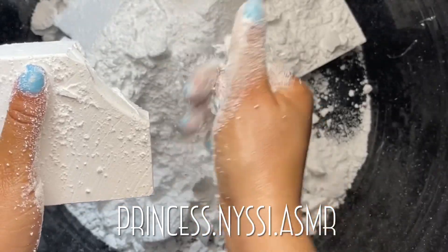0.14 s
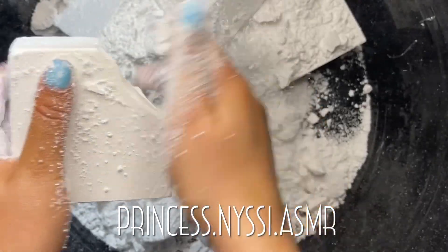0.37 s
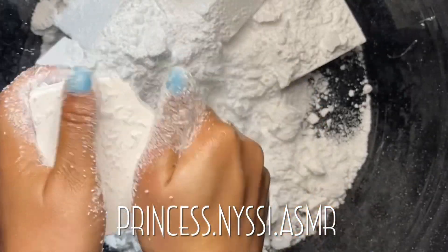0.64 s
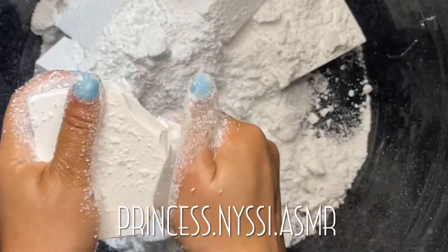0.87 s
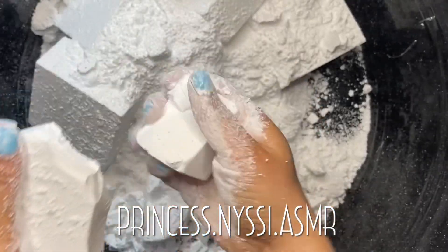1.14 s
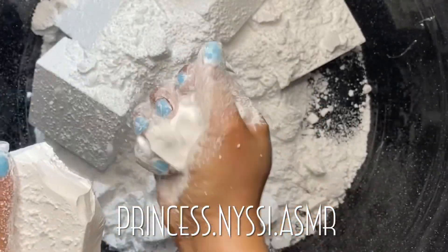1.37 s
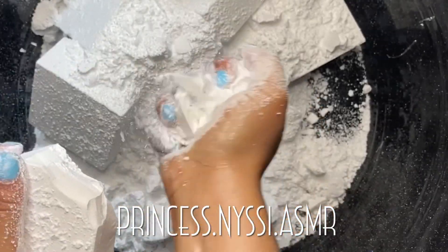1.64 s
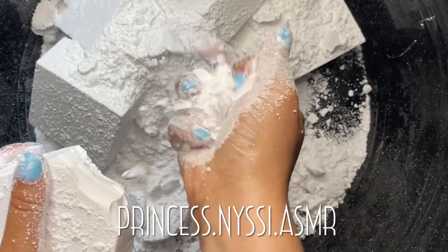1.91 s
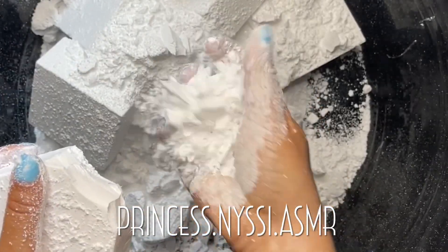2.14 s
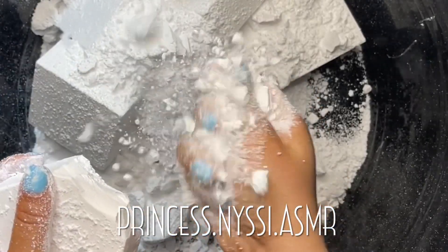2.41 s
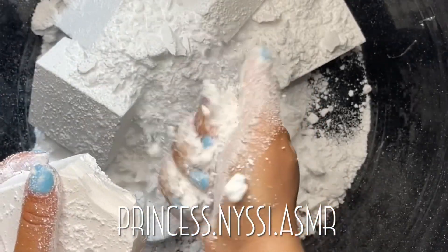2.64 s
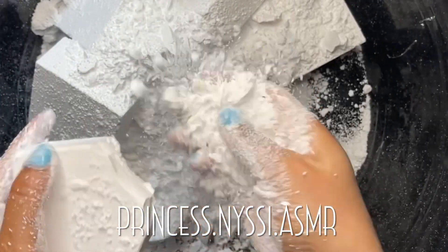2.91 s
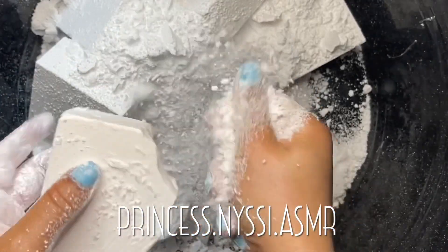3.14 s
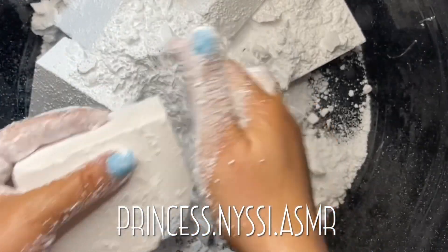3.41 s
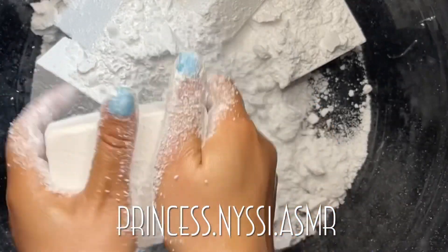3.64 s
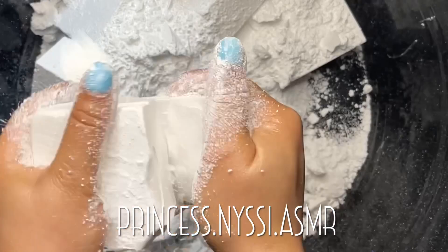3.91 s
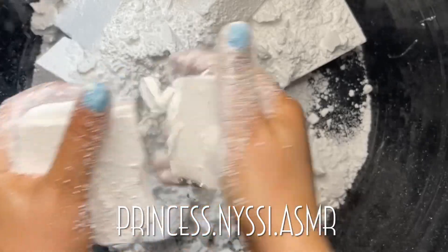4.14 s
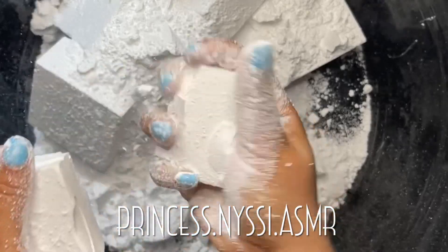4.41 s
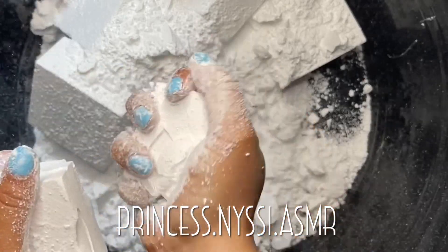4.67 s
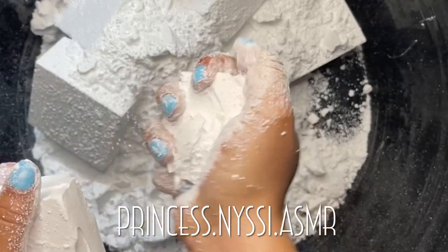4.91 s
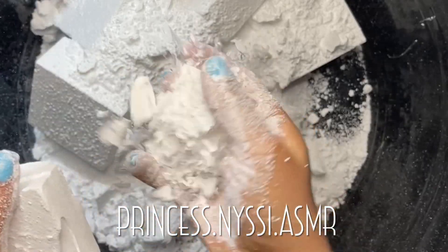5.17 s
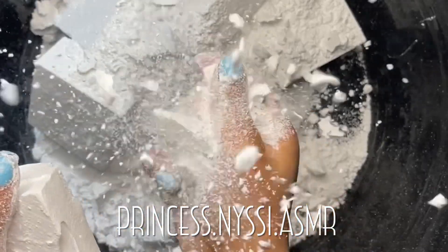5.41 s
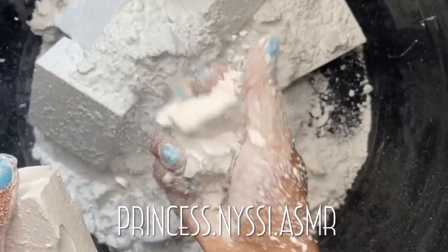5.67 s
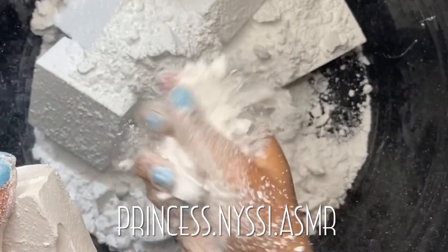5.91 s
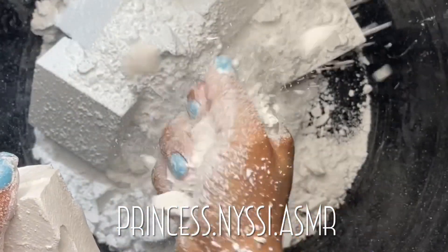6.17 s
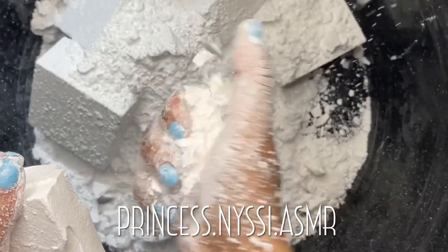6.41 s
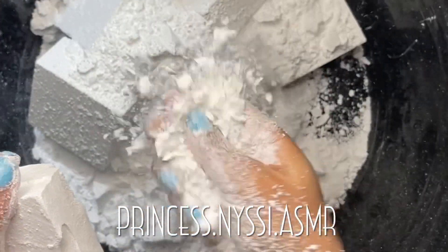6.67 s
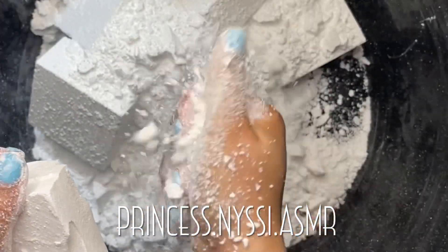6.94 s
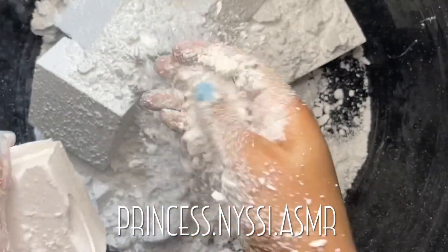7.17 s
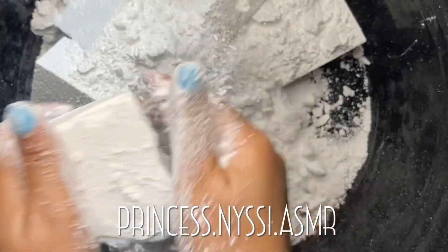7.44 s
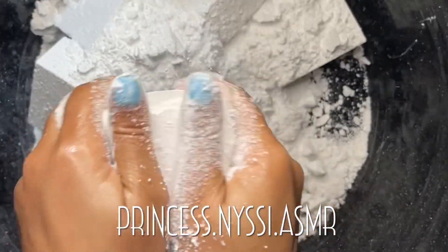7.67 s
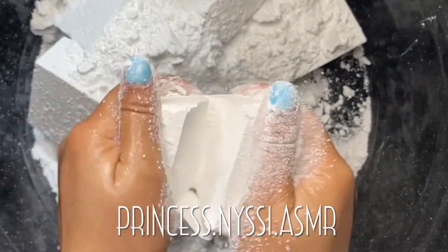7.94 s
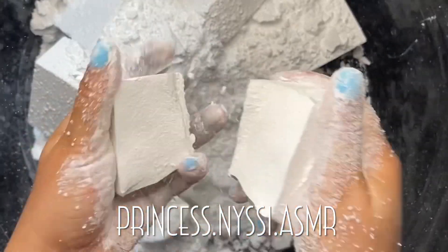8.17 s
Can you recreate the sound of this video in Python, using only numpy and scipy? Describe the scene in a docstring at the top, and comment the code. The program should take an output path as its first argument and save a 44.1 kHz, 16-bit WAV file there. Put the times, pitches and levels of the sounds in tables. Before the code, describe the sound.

Hands break and crush soft chalk close to a pair of microphones. Small lumps drop first, then a block snaps and crisp cracks sputter on. Powdery rubbing and falling crumbs lead to a louder snap with a short squeak, then dense crunching with low tub thuds. It thins before a final hollow snap. Quiet room, faint rumble, hiss and hum; the loudest blows distort.

```python
"""Hands snap and crush soft chalk blocks over a wide plastic tub, close to a pair of microphones.
Small lumps and cracks come first, then a block snaps at 0.7 s and more cracks follow until 1.8 s.
Rubbing and falling crumbs lead to a snap at 3.8 s with a squeak; crushing is densest from 5.1 to 6.4 s.
It thins out, with a squeak at 7.0 s and a last snap at 7.7 s. Cracks and grit are filtered bursts and ticks,
lumps ring the tub's modes, and faint rumble, hiss and hum last throughout. The loudest blows overload."""
import sys
import numpy as np
from scipy import signal
from scipy.fft import rfft, irfft
from scipy.io import wavfile
from scipy.ndimage import uniform_filter1d

SR = 44100
rng = np.random.default_rng(int(sys.argv[2]) if len(sys.argv) > 2 else 0)


def ratio(d):
    """dB to gain"""
    e = np.asarray(d, float) / 20
    return 10 ** e


def pcm_store(signal):
    """Save signal as 16-bit PCM."""
    levels = np.round(np.clip(np.atleast_2d(signal), -1, 1) * 32767)
    wavfile.write(sys.argv[1], SR, levels.astype(np.int16).T)


N = 366466  # length in samples

# Low part of the sound of breaking chalk. Each row: frequency in Hz, relative level in dB.
DULL_COLOUR = [(20, -56), (80, 13.5), (250, 11), (400, 13.5), (650, 6.5), (1500, -9.5), (3000, -49.5)]
# Middle part of the sound of breaking chalk. Each row: frequency in Hz, relative level in dB.
BODY_COLOUR = [(300, 4.5), (900, 8), (1800, 9.5), (2700, 8.5), (3800, 9), (4800, -4), (9000, -62)]


def read(points, hz):
    """Looks a value up between table points on a log-frequency axis."""
    f, value = np.transpose(points)
    return np.interp(np.log(hz + 1), np.log(f + 1), value)


def evened(x):
    """Scales a sound to rms 1."""
    return x / np.sqrt(np.mean(x ** 2) + 1e-20)


def colour(x, points):
    """Gives a sound the spectrum of a table, with a filter that never acts ahead of time and has energy 1."""
    log_gain = np.log(ratio(read(points, abs(np.fft.fftfreq(4096, 1 / SR)))))
    minimum_phase = np.exp(np.conj(signal.hilbert(log_gain)))
    taps = np.fft.ifft(minimum_phase).real[:2048]
    return signal.oaconvolve(x, taps[None] / np.linalg.norm(taps), axes=1)[:, :N]


def ring(x, hz, q):
    """Two-pole resonance: a unit tick rings with height about 1, longer for a higher q."""
    r, turn = np.exp(-np.pi * hz / q / SR), 2 * np.pi * hz / SR
    top = [np.sin(turn), 0, -np.sin(turn) * r]
    bottom = [1, -2 * r * np.cos(turn), r * r]
    return signal.lfilter(top, bottom, x) / (2 * np.sin(turn))


def ports(pair):
    """Mixes two unrelated versions into the two microphones: alike in part, the right a little late."""
    # How alike left and right are. Each row: frequency in Hz, correlation from 0 to 1.
    likeness = [(300, 0.92), (900, 0.76), (2000, 0.9), (4000, 0.82), (12000, 0.48)]
    # Balance of the microphones. Each row: frequency in Hz, left over right in dB.
    balance = [(200, 0), (700, -0.5), (2400, -2.5), (8000, 0), (15000, 1)]
    right_delay_s = 4.5e-5  # the left microphone is nearer
    hz = np.fft.rfftfreq(N, 1 / SR)
    a, b = rfft(pair)
    turn = np.arccos(np.clip(read(likeness, hz), 0, 1)) / 2
    lean = ratio(read(balance, hz) / 2)
    left = np.cos(turn) * a + np.sin(turn) * b
    right = np.cos(turn) * a - np.sin(turn) * b
    late = np.exp(-2j * np.pi * hz * right_delay_s)
    return irfft(np.array([left * lean, right / lean * late]), N)


def hand():
    """The hand tightens, holds and lets go; the powers of all squeezes add up to control curves in dB."""
    # Each squeeze or rub. Each row: start in seconds, hold in seconds, grit in dB,
    # fine powder against the grit in dB, crumbs raining into the tub in dB.
    squeezes = [(-.03, 0.095, -52, 2.5, -31.5), (0.235, 0.058, -46.5, 9, -29.5),
                (0.324, 0.05, -47, 10, -33), (0.476, 0.059, -44.5, 10, -37), (0.632, 0.036, -39, 2, -39),
                (1.053, 0.14, -45, 2, -33), (1.318, 0.065, -35.5, 0.5, -41), (1.46, 0.29, -48.5, 5.5, -36),
                (1.785, 0.2, -44, -5, -32.5), (2.115, 0.3, -37.5, -1.5, -26.5),
                (2.392, 0.19, -37.5, -3, -22), (2.637, 0.22, -52.5, 6.5, -29),
                (2.865, 0.042, -40, -1, -23.5), (2.92, 0.027, -40, 2.5, -28), (3.017, 0.13, -43, 2, -16),
                (3.206, 0.079, -49.5, 6.5, -27.5), (3.419, 0.15, -42.5, 5, -27.5),
                (3.53, 0.15, -46.5, -4, -28.5), (3.723, 0.055, -41, -12, -44),
                (3.793, 0.047, -28, -10, -26), (3.85, 0.03, -34, -4.5, -33), (3.947, 0.21, -55.5, 8, -30.5),
                (4.195, 0.33, -53, 3, -37), (4.357, 0.092, -63, -15, -26.5), (4.54, 0.11, -48, 0.5, -50),
                (4.69, 0.18, -60.5, 4.5, -60), (4.902, 0.12, -41, -3, -77), (5.108, .18, -42, 3.5, -45),
                (5.355, 0.097, -32.5, -3.5, -24.5), (5.454, 0.23, -35.5, -4, -22.5),
                (5.797, 0.13, -37.5, -4.5, -28), (5.99, 0.098, -32, -4.5, -26),
                (6.13, 0.14, -41.5, -5, -26.5), (6.294, 0.028, -27, -21, -31),
                (6.358, 0.023, -33.5, -3, -15), (6.47, 0.17, -34, -9, -22.5), (6.603, .2, -39.5, 2, -25),
                (6.824, 0.14, -45, 3, -28), (7.03, 0.14, -45, -6, -26.5), (7.12, 0.14, -41, -3, -26),
                (7.36, 0.24, -48, 4, -24), (7.506, 0.083, -52.5, 5, -22.5),
                (7.633, 0.032, -39, -5.5, -30.5), (7.692, 0.024, -39, 0, -25),
                (7.755, 0.14, -45.5, -23.5, -44), (7.972, 0.048, -62.5, 17.5, -40.5),
                (8.17, 0.089, -52.5, 11, -37)]
    grip_s, swell_share = 0.01, 0.27  # the rise takes grip_s plus this share of the hold
    let_go_db_per_s = 132
    still_db, still_crumbs_db = -57.5, -49.5  # what stirs in between
    start, hold, grit_db, fine_db, crumbs_db = np.transpose(squeezes)[:, :, None]
    t = np.arange(0, N / SR + .01, .004)
    tighten = np.clip((t - start) / (grip_s + swell_share * hold), 0, 1)
    let_go = ratio(-let_go_db_per_s * np.maximum(t - start - grip_s - hold, 0))
    grip = tighten * let_go

    def total_db(db, floor_db):
        """Adds the powers of all squeezes and of the still level."""
        return 10 * np.log10(((grip * ratio(db)) ** 2).sum(0) + ratio(floor_db) ** 2)

    grit_sum = total_db(grit_db, still_db)
    fine_sum = total_db(grit_db + fine_db, still_db)
    crumbs_sum = total_db(crumbs_db, still_crumbs_db)
    coarse = 0.5 + 0.68 * (crumbs_sum - grit_sum - 20)  # more falling crumbs, more coarse crumble
    controls = {"grit": grit_sum, "fine": fine_sum - grit_sum, "crumbs": crumbs_sum, "coarse": coarse}
    return {name: np.interp(np.arange(N) / SR, t, curve) for name, curve in controls.items()}


def cracks():
    """A fracture starts with one sharp tick and runs on as an uneven sputter; the freed piece rings briefly."""
    # Each crack. Each row: start in seconds, relative strength in dB, ring of the piece in Hz,
    # relative brightness in dB, left over right in dB.
    crack_rows = [(0.267, -25, 567, -22, -2.0), (0.287, -20.5, 2080, -18, -1), (0.381, -25.5, 1500, -5, -4),
                  (0.624, -19, 537, -4, -3), (0.646, -1, 4100, -15.5, -1), (0.666, -6, 4000, -11, -2),
                  (0.671, -7, 2060, -4.5, 7), (0.686, -3, 2780, -26, -7), (0.734, -11, 2470, -9, 0),
                  (0.874, -33.5, 900, -5, -4), (1.082, -24, 2500, -5.5, -1.5), (1.116, -29.5, 655, -1, 2),
                  (1.151, -32.5, 1120, -9, 7), (1.186, -11, 3280, -31, -6), (1.223, -27, 3180, -18, -0.5),
                  (1.299, 11, 2810, -19, 1), (1.34, -7.5, 1660, -13, -1), (1.37, 0, 3340, -35, -3.5),
                  (1.383, -12, 3510, -4, 7), (1.394, -7, 2400, -23, -6), (1.402, -5.5, 2930, -21, -2.5),
                  (1.429, -9.5, 2860, -19, 8), (1.45, -10.5, 2720, -45, -2), (1.487, -26.5, 940, 11, 4),
                  (1.5, -1, 2540, -22.5, -1.5), (1.511, -18, 3700, -9, -10),
                  (1.542, -15.5, 1960, -4.5, 0.5), (1.569, -26, 3340, -15, -5), (1.604, -18, 1440, -14, 4),
                  (1.614, -7.5, 2940, -21, -2.5), (1.666, -14.5, 1790, -12, 1),
                  (1.678, -5, 3170, -36, -3.0), (1.693, -15.5, 2360, -13, 4), (1.775, -21, 2060, -25, 1),
                  (1.845, -19, 2880, -26, -1.5), (1.862, -24.5, 613, -3, -1.5), (1.956, -19, 840, -22, -4),
                  (1.968, -16.5, 2360, -32, 0), (2.059, -28, 1660, -23, -3), (2.159, -29.5, 2030, 4.5, -2),
                  (2.219, -21, 2620, -39, -4), (2.274, -16, 1900, -17, -5), (2.306, -16.5, 1830, -14, 2),
                  (2.385, -19, 2150, -24, -4), (2.447, -25, 1010, -10, 0), (2.476, -12, 920, -9, -7.5),
                  (2.604, -18, 674, -30, -4), (2.655, -20, 655, -41, -10), (2.779, -32.5, 686, 1, 2),
                  (2.866, -24, 640, -8, 0), (2.884, -23, 619, -20, 0), (2.912, -33, 560, -16, -1.5),
                  (2.935, -20.5, 1540, -17, 2), (2.953, -19, 3260, -13, -8), (2.977, -36, 622, 9, 8),
                  (3.054, -19, 1930, -27, -4), (3.072, -22.5, 604, -3.5, -3.0),
                  (3.134, -35, 783, -10, -1.0), (3.166, -16, 756, -29, -1), (3.248, -21.5, 993, -23, 2),
                  (3.4, -24, 3980, -20, -2), (3.465, -30, 1180, -9, 7), (3.548, -12, 2320, -23, 0),
                  (3.584, -25, 1530, -22, -13), (3.602, -16, 860, -7, -4), (3.621, -13.5, 660, -61, -10),
                  (3.803, 8, 2080, -10.5, -1.0), (3.827, -16, 645, -30, -2.0),
                  (3.979, -17, 1060, -8.5, 1.0), (4.009, -22.5, 589, -12, 8), (4.062, -21, 651, -39, 3),
                  (4.098, -22.5, 750, -27, -3), (4.217, -28, 1070, -8, -1.5), (4.238, -29, 610, -9, -3.5),
                  (4.329, -34, 552, -21, 3), (4.343, -32, 875, -9, 2), (4.368, -15.5, 1210, -3.5, -1),
                  (4.53, -6, 2970, -26, -1), (4.55, -1, 2000, -8.5, 0.5), (4.583, -2, 3500, -23.5, 0),
                  (4.611, -6.5, 2840, -48, -1), (4.644, -13, 2760, -32, 0), (4.703, -13, 2930, -19.5, 0),
                  (4.799, -15.5, 2580, -43, -2), (4.934, -13, 2270, -8, 0.5), (4.954, -18.5, 2100, -23, 0),
                  (4.983, -26, 2570, -29, -1.5), (5.007, -22, 2090, -22, -2.0), (5.018, -27, 600, -1, -0.5),
                  (5.038, -10.5, 3300, -24, -2), (5.11, -1, 2680, -33, 0), (5.13, -16, 891, 4, 0),
                  (5.141, -16, 1870, -3.5, -4), (5.165, -8.5, 1410, -4, 8), (5.171, -5, 1530, -5, -2),
                  (5.192, -0.5, 2120, -5.5, -3), (5.2, 1, 1960, -52, 4), (5.216, -6, 990, -9.5, 0),
                  (5.223, -13, 1010, -3, -5), (5.244, -4.5, 2340, -8, 0), (5.28, -3.5, 2460, -12, -1),
                  (5.34, -13.5, 600, -38, -4), (5.356, -18, 920, 5, 2), (5.372, -6.5, 2080, -31, -1.0),
                  (5.388, -9.5, 896, -11, -2.5), (5.405, -11, 1530, -6.5, -0.5), (5.452, -20, 1520, -4, 3),
                  (5.481, -12.5, 830, -11.5, -4), (5.506, -13, 1740, -37, 0.0), (5.539, -10, 1470, -35, 7),
                  (5.552, -10, 880, -39, 1), (5.618, -17.5, 1260, -34, -1.0), (5.638, -11, 1860, -44, 13),
                  (5.65, -24, 557, -11, -3), (5.728, -30, 580, -18, -12), (5.831, -23.5, 574, 1, -1.5),
                  (5.837, -13.5, 2300, -9, -1), (5.892, -10.5, 595, -35, -4), (5.909, -6.5, 1790, -13, 1),
                  (5.936, -8.5, 1830, -10.5, 0), (5.988, -12, 1380, -7, 1), (6.008, -9.5, 920, -11, 1),
                  (6.028, 2, 3350, -38, -2.0), (6.038, -9.5, 664, -5.5, 1), (6.048, 2.5, 2200, -12.5, -1),
                  (6.065, -13.5, 950, -3, -3), (6.089, -3, 3630, -55, -1.5), (6.107, -12, 2070, -14, -3),
                  (6.148, -17, 1350, -6, 0), (6.171, -3, 1670, -10, -2), (6.288, -1, 1050, -28, 3),
                  (6.293, -0.5, 1140, -51, -11), (6.334, -18.5, 824, -33, 1), (6.37, -16, 600, -37, 3),
                  (6.386, -5.5, 600, -19.5, -3), (6.415, -25, 649, -8, 3), (6.504, -9, 1120, -34, 5),
                  (6.515, -9, 560, -40, -4), (6.544, -17, 1370, -39, -6), (6.697, -21.5, 790, -1.5, -3),
                  (6.722, -19.5, 3270, 2.5, -2.5), (6.781, -18, 2610, -21, -4), (6.837, -25, 636, -23, -5),
                  (6.88, -25, 1930, -18, -5), (6.931, -28, 570, -4, -7), (7.044, -13, 2100, -9, -2),
                  (7.143, -10, 1120, -20, -8), (7.155, -20, 664, -22, -11), (7.176, -20, 1360, -16, -4),
                  (7.215, -13, 3160, -16, -1.0), (7.406, -19.5, 626, -9, -9), (7.414, -6, 2950, -19, 3),
                  (7.514, -28, 570, -22, -15), (7.548, -26, 1120, -25, -6), (7.585, -12, 2630, -25, -10),
                  (7.6, -25, 2230, -12, -9), (7.635, -19, 864, -16, -11), (7.658, -25, 810, 1, -4),
                  (7.716, -24, 1870, -11, -2.5), (7.746, 1, 636, -11.5, -1.5), (7.856, -21, 1840, -41, -3),
                  (8.076, -36, 560, 14, -3), (8.193, -31, 1490, -3, 2), (8.217, -17.5, 656, -6.5, 1)]
    # Bright part of a fracture. Each row: frequency in Hz, relative level in dB.
    sharp_colour = [(2000, -31.5), (4000, 11), (5000, 15), (7500, 17), (10000, 2), (13000, 2.5),
                    (16000, -8.5), (20000, -54)]
    length = 2400  # samples kept for each crack
    t = np.arange(length) / SR
    drive = np.zeros((4, 2, N + length))  # dull, body, sharp, ringing
    lean = np.zeros(N + length)
    chance = rng.standard_normal((len(crack_rows), 3, length))
    for (s, db, hz, bright_db, pan_db), (a, b, c) in zip(crack_rows, chance):
        dull_db = -18.5 - 11.5 * np.log2(hz / 1437)  # bigger pieces ring lower and break duller
        t60 = 0.016 * (1 + 0.0274 * (db + 18.5))  # seconds; a strong fracture runs on a little longer
        uneven = ratio(10.5 * uniform_filter1d(c, 12))
        fade = ratio(-60 * t / t60) * (1 - np.exp(-t / 0.00047))
        burst = 0.37 * np.array([a, b]) * uneven * fade
        burst[0, 8] += 1.34 * np.sign(a[0])  # the sharp tick
        burst *= ratio(db)
        at = slice(round(s * SR), round(s * SR) + length)
        shares = np.array([1.93 * ratio(min(dull_db, 3)), 1.41 * ratio(0.38 * bright_db), 3.2 * ratio(bright_db)])
        drive[:3, :, at] += shares[:, None, None] * burst
        overtone = ring(ring(burst, 2.7 * hz, 0.47), 0.98 * hz, 0.59)
        drive[3, :, at] += 0.63 * ring(burst, hz, 2.27) + hz / SR * overtone
        lean[at] = pan_db  # each piece breaks a little to one side
    broken = sum(colour(d, c) for d, c in zip(drive, (DULL_COLOUR, BODY_COLOUR, sharp_colour)))
    sound = ports(drive[3, :, :N] + broken)
    return sound * ratio(uniform_filter1d(lean[:N], 40) * np.array([[.5], [-.5]]))


def grit():
    """Many tiny fractures in clumps, each crumb with its own pitch, over a rasp of powder on skin."""
    # Fine powder. Each row: frequency in Hz, relative level in dB.
    bright_colour = [(2000, -24), (4500, 0), (6800, 6.5), (8200, 2.5), (10000, -1), (13000, -6.5),
                     (16000, -15), (20000, -78)]
    control = hand()
    clumps = ratio(6.0 * evened(uniform_filter1d(rng.standard_normal(N), 400)))
    size = ratio(8.0 * np.minimum(rng.exponential(1, (2, N)), 4)) * rng.choice([-1., 1.], (2, N))
    ticks = size * (rng.random(N) < 1200 * clumps / SR)  # 1200 a second where clumps is 1
    pitches = np.geomspace(500, 8000, 14)  # Hz
    crumb = rng.integers(0, 14, N)  # which pitch a tick gets
    grains = np.zeros((2, N))
    for k, hz in enumerate(pitches):
        grains += evened(ring(ticks * (crumb == k), hz, 3.5)) * np.sqrt(hz)
    grains = evened(grains)
    rasp = evened(rng.standard_normal((3, 2, N)) * np.sqrt(clumps))
    dull, body, bright = (share * grains + np.sqrt(1 - share ** 2) * r
                          for share, r in zip((.5, .45, .35), rasp))
    body = evened(colour(body, BODY_COLOUR))
    muffled = evened(signal.sosfilt(signal.butter(4, 2400, fs=SR, output="sos"), body))
    dark = np.clip(-control["fine"] / 12, 0, 1)  # with little fine powder, only bigger crumbs settle
    coarse = (1 - dark) * body + dark * muffled
    coarse += ratio(control["coarse"]) * evened(colour(dull, DULL_COLOUR))
    fine = ratio(control["fine"]) * evened(colour(bright, bright_colour))
    return ports(ratio(control["grit"]) * (coarse + fine))


def squeaks():
    """Chalk slips on chalk in quick stick and slip: a wobbly tone with its octave, roughened by dust."""
    # Each squeak. Each row: start in seconds, length in seconds, middle pitch in Hz, level of the main tone in dB.
    squeak_rows = [(3.859, 0.068, 2045, -31), (7.043, 0.026, 1963, -30)]
    out = np.zeros(N)
    for s, length, hz, db in squeak_rows:
        wobble, dust = rng.standard_normal((2, round(length * SR)))
        pitch = hz * (1 + 0.11 * uniform_filter1d(wobble, 60))
        turns = 2 * np.pi * np.cumsum(pitch) / SR
        tone = np.sin(turns) + 0.45 * np.sin(2 * turns) + 0.4 * dust
        out[round(s * SR):][:len(tone)] += ratio(db) * tone * signal.windows.tukey(len(tone), .5)
    return out


def snaps():
    """A block breaks in two and its halves spring apart: a slow push of air, a hollow knock and a short ring."""
    # Each snap. Each row: start in seconds, relative push of air in dB, hollow knock in dB,
    # ring of the halves in Hz, level of that ring in dB.
    snap_rows = [(.670, -5.5, -10.5, 2090, -11.5), (3.803, 5, 7, 2180, -8), (7.746, -1, -3, 1920, -3.5)]
    push_s, knock_hz = 0.0093, 402
    t, out = np.arange(6000) / SR, np.zeros((2, N + 6000))
    for s, push_db, knock_db, hz, ring_db in snap_rows:
        push = ratio(push_db) * (1 - t / push_s) * np.exp(-t / push_s) * (1 - np.exp(-t / 0.0026))
        knock = ratio(knock_db - 60 * t / 0.021) * np.sin(2 * np.pi * knock_hz * t)
        halves = ratio(ring_db - 60 * t / 0.029) * np.sin(2 * np.pi * hz * t)
        uneven_push = np.array([[1.3], [.1]]) * push  # much stronger at the left microphone
        out[:, round(s * SR):][:, :6000] += uneven_push + knock + halves
    return out[:, :N]


def tub():
    """Lumps and crumbs push the tub floor; each lands elsewhere and so rings each mode by its own amount."""
    # Each lump that lands. Each row: time in seconds, relative strength in dB,
    # upper modes in dB per octave above 150 Hz, where -13 rings the tub evenly.
    lump_rows = [(0.073, -26, -0.5), (0.187, -27.5, -13), (0.267, -20, -12), (0.467, -21, -21),
                 (0.497, -18, -7), (0.63, -16.5, -14.5), (1.096, -9.5, -15.5), (1.188, -20.5, -8),
                 (1.288, -20, -16), (1.54, -23.5, -17), (1.6, -31, -2), (1.778, -14, -13),
                 (1.849, -12, -19), (1.95, -9.5, -13), (2.108, -18, -12), (2.192, -22, -18),
                 (2.272, -17, 0.5), (2.329, -16, -20), (2.44, -20, -20), (2.516, -14.5, -6.5),
                 (2.647, -8.5, -6.5), (2.866, -13, -8.5), (3.073, -9, -7), (3.133, -9, -5),
                 (3.261, -30, -2), (3.396, -19.5, -20.5), (3.489, -17, -8), (3.597, -6.5, -17.5),
                 (3.793, -10.5, -15), (3.981, -1.5, -8), (4.056, -6.5, -6), (4.147, -34, -13),
                 (4.222, -14, -23), (4.317, -16, -18.5), (4.479, -21.5, -21), (5.132, -24, -10),
                 (5.19, -22.5, -17), (5.269, -13, -11.5), (5.344, -11.5, -2), (5.385, -5.5, -5.5),
                 (5.47, -11.5, -5.5), (5.545, 1.5, -6), (5.749, -33, -1), (5.894, -11, -6),
                 (6.046, -9.5, -6), (6.167, -14, -6.5), (6.289, 2.5, -2.5), (6.34, 2.5, -4),
                 (6.506, -13.5, 3), (6.692, -5, -13), (6.81, -21, -22), (6.929, -16.5, -9),
                 (7.044, -13.5, -6), (7.145, -13.5, -2.5), (7.217, -11.5, -13), (7.419, -4, -18.5),
                 (7.529, -22, -17), (7.736, -23, -6), (7.84, -29, -15), (8.065, -29.5, -27),
                 (8.223, -8, -21.5)]
    # Each mode of the tub. Each row: frequency in Hz, time to fade by 60 dB in seconds,
    # relative level alike at both microphones in dB, relative level opposite at the two in dB.
    modes = [(48.7, 0.077, -9, 0), (90.2, 0.17, -3, -9), (109.7, 0.11, 0.5, 0.5),
             (151.8, 0.22, -10.5, -10.5), (176.7, 0.19, -10, -1.5), (214.7, 0.096, -2, -28.5),
             (231.4, 0.18, -7, -14), (384, 0.11, -33.5, -31.5), (611, 0.027, -20, -13.5)]
    even_db, sideways = -13, 0.8  # sideways: share of the push that goes sideways
    s, db, upper_db = np.transpose(lump_rows)
    at = np.round(s * SR).astype(int)
    t, out = np.arange(SR // 2) / SR, np.zeros((2, N))
    spot = rng.standard_normal((len(lump_rows), len(modes)))
    crumbs = ratio(hand()["crumbs"]) * (rng.random(N) < 150 / SR)  # about 150 crumbs a second
    for (hz, t60, common_db, opposite_db), place in zip(modes, spot.T):
        drive = crumbs * rng.standard_normal((2, N))
        push = ratio(db + (upper_db - even_db) * np.log2(hz / 150) + 2.0 * place)
        drive[:, at] += [push, push * sideways * np.sign(place)]
        boom = np.sin(2 * np.pi * hz * t) * ratio(-60 * t / t60) * (1 - np.exp(-t / 0.012))
        rung = signal.oaconvolve(drive, boom[None], axes=1)[:, :N]
        out += ratio(np.array([[common_db], [opposite_db]])) * rung
    common, opposite = out
    return np.array([common + opposite, common - opposite])


def room(x):
    """Reflections: sparse taps of random sign, each band dying at its own speed."""
    # Fading of the room. Each row: frequency in Hz, time to fade by 60 dB in seconds.
    fading = [(200, 0.29), (1000, 0.27), (2300, 0.34), (3000, 0.29), (6000, 0.099), (12000, 0.009)]
    taps = np.zeros((2, SR // 2))
    at = np.arange(100, SR // 2 - 20, 20) + rng.integers(0, 20, (2, (SR // 2 - 101) // 20))
    np.put_along_axis(taps, at, rng.choice([-1., 1.], at.shape), 1)
    hz, t, z = signal.stft(taps, SR, nperseg=256)
    fade = ratio(-60 * t / read(fading, hz)[:, None])
    tail = signal.istft(z * fade, SR, nperseg=256)[1]
    return signal.oaconvolve(x, tail / np.linalg.norm(tail[0]), axes=1)[:, :N]


def air():
    """Quiet indoor rumble and hiss, as filtered noise, with a faint wavering hum."""
    # Colour of the background. Each row: frequency in Hz, relative level in dB.
    air_colour = [(12, -53), (20, 6), (138, -2.5), (446, -19.5), (1660, -73), (1960, -45), (7520, -32),
                  (8650, -53), (9400, -62), (11400, -30.5), (16000, -53)]
    air_db, hum_db, hum_hz = -41.5, -46.5, 118
    gain = ratio(read(air_colour, np.fft.rfftfreq(N, 1 / SR)))
    hiss = evened(irfft(rfft(rng.standard_normal((2, N))) * gain, N))
    waver = 1 + 0.69 * evened(uniform_filter1d(rng.standard_normal(N), 4000))
    hum = waver * np.sin(2 * np.pi * hum_hz * np.arange(N) / SR)
    return ratio(air_db) * hiss + ratio(hum_db) * hum


def scene():
    """Chalk with its reflections, the snaps, the tub and the air."""
    chalk = cracks() + grit() + squeaks()
    return chalk + ratio(-16.5) * room(chalk) + snaps() + tub() + air()


def band_limit(x):
    """A steep low-pass at the top of the band."""
    return signal.sosfilt(signal.butter(12, 16710, fs=SR, output="sos"), x)


def record(dry):
    """The converter overloads: it clips whatever goes over full scale."""
    mix = np.clip(dry, -1, 1)
    return band_limit(mix)


dry = scene()
out = record(dry)
pcm_store(out)
```